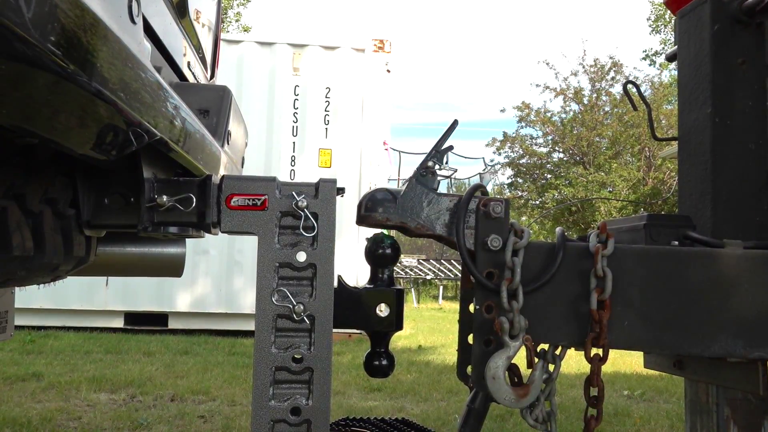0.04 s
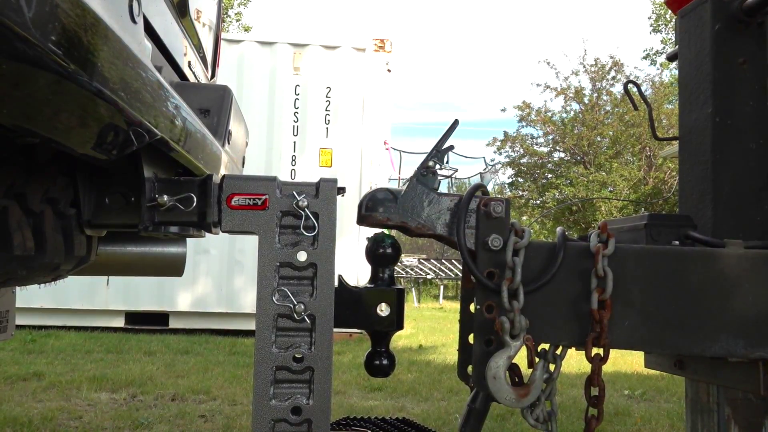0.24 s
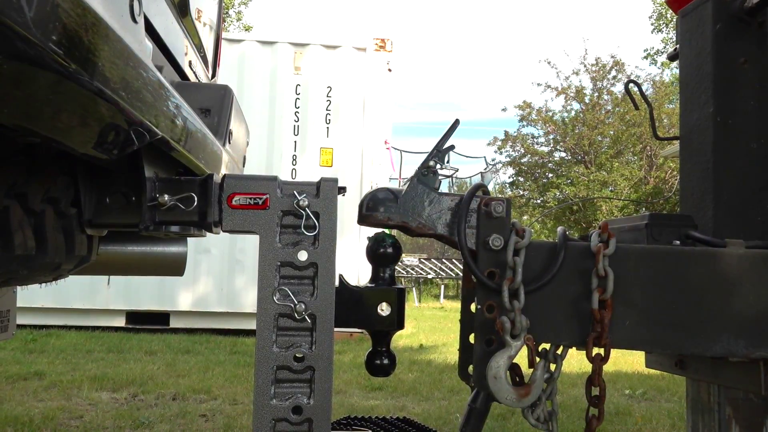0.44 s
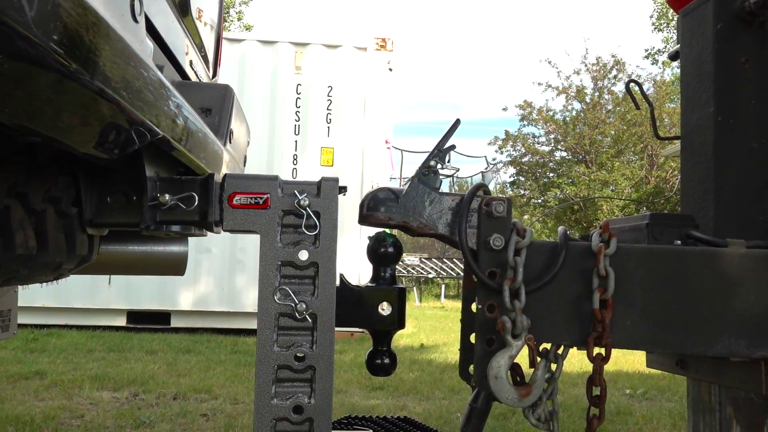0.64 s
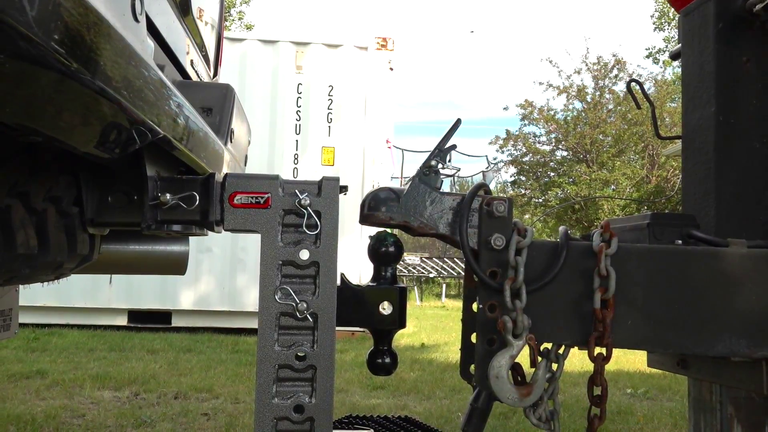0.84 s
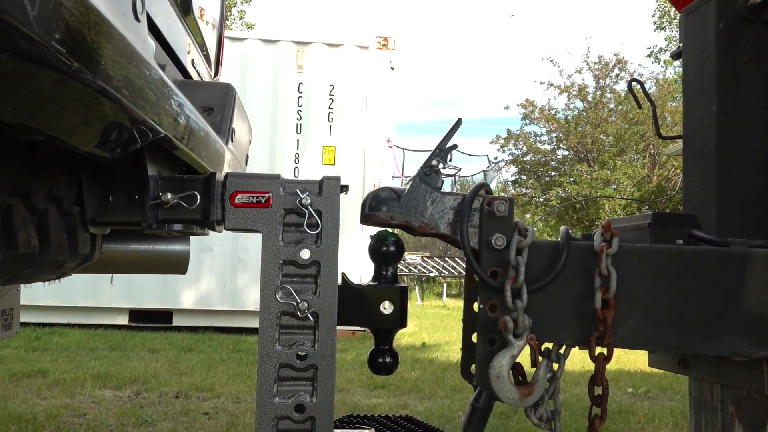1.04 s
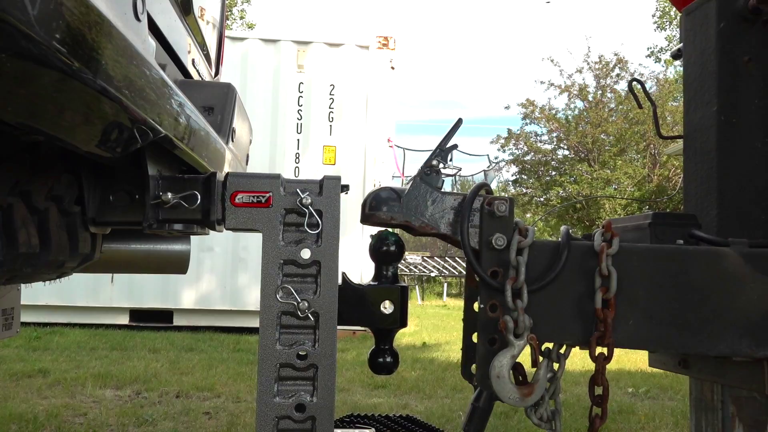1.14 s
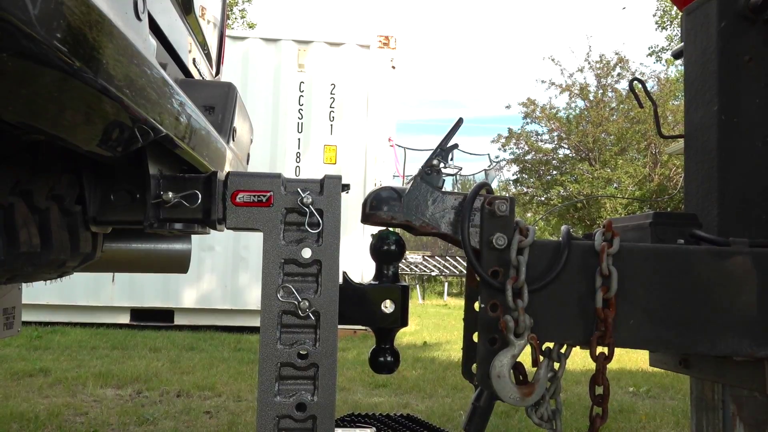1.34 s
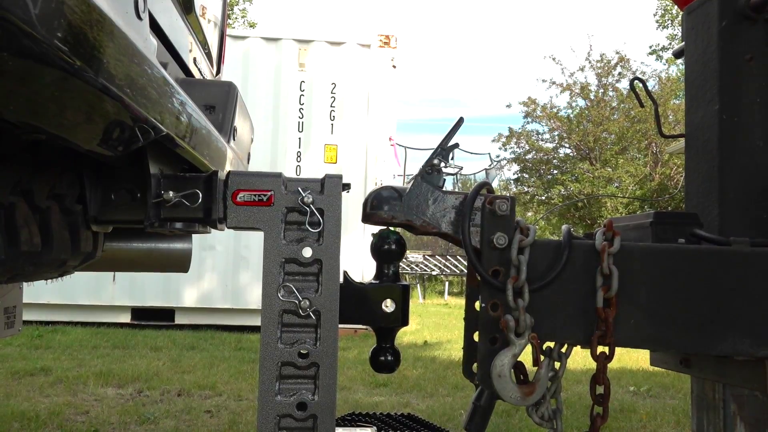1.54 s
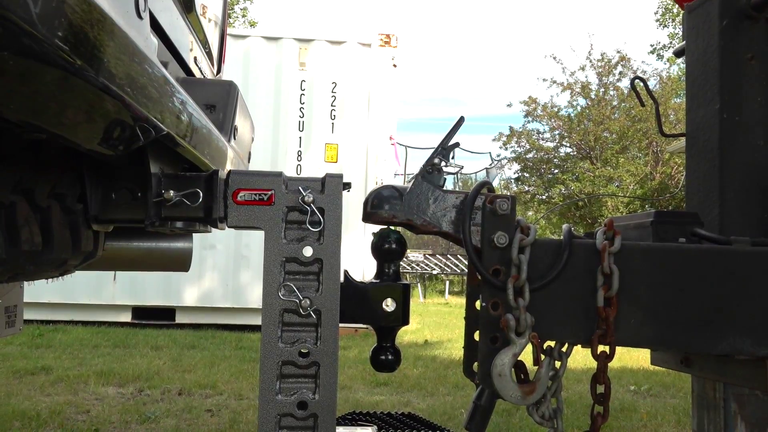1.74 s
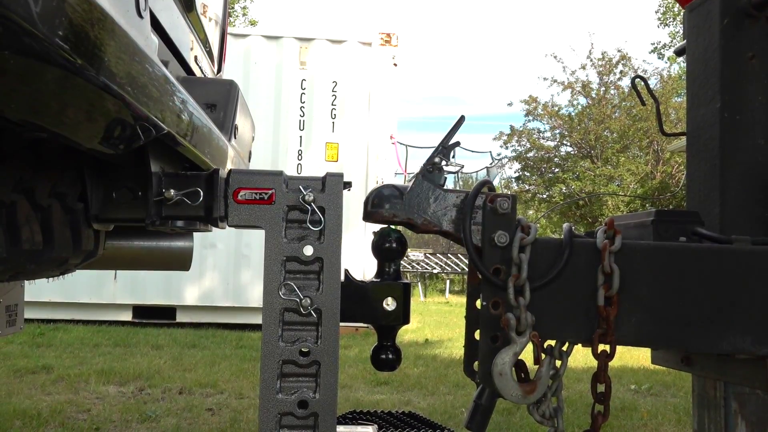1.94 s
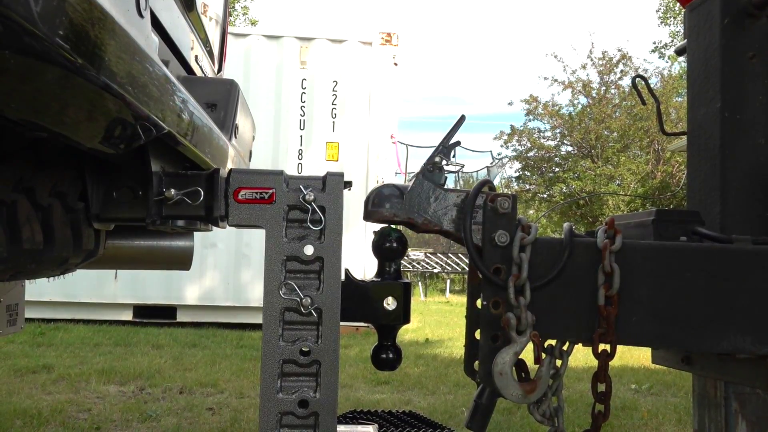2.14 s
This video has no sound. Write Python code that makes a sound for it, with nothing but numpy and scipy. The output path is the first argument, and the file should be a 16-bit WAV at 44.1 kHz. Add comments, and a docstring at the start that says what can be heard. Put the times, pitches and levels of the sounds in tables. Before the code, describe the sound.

Rusty steel scrapes and squeals, rasping from 0.17 seconds, loudest around 0.4 to 0.5, fading by 0.75, with a knock near 0.2. Hitch knocks cluster at 1.04 to 1.25, then a soft low bump at 1.33. Chain clicks and a brief scrape come at 1.45 to 1.8, fainter scraping and ticks at 2.0 to 2.17. Close, slightly right, short yard echo; faint engine idle and airy hiss throughout.

```python
"""Rusty steel scrapes and squeals as a jack turns to couple a trailer; the hitch knocks and chain links click.
Scrapes are filtered grit clicks, squeals wavering harmonic stacks, knocks and clicks damped modes with noise.
Low bumps of the frame are swelling sines. A truck engine idles softly: firing pulses ring an exhaust.
Coloured noise makes the open-air hiss. The stereo image sets the steel a little to the right."""
import sys
import numpy as np
from scipy import signal
from scipy.fft import rfft, irfft
from scipy.io import wavfile
from scipy.ndimage import uniform_filter1d

SR = 44100
rng = np.random.default_rng(int(sys.argv[2]) if len(sys.argv) > 2 else 0)


def to_wav(s):
    """Save 16-bit WAV."""
    ch = np.atleast_2d(s).T  # columns
    pcm = np.round(np.clip(ch, -1, 1) * 32767)  # PCM
    wavfile.write(sys.argv[1], SR, pcm.astype(np.int16))


def field_ratio(decibels):
    """Amplitude ratio for a level in dB (20 dB per decade); scalars and array-likes work."""
    return 10 ** (np.asarray(decibels, dtype=float) / 20)


N = 97020
T = np.arange(N) / SR

# eight firings of an engine cycle: [relative_db]
CYLINDER_DB = [9, -11.5, 6, 9, 9, 9, -8, 8]
# exhaust resonances: [centre_hz, width_hz of the first of two filters, rms_db]
EXHAUST_MODES = [(39.6, 5.4, -72), (60, 19, -81), (84, 15, -69), (95.6, 13, -67.5), (118.8, 12, -91),
                 (329.3, 27, -71.5), (389, 48, -70.5)]
# outdoor hiss spectrum: [freq_hz, relative_db]
AIR_SPECTRUM = [(30, -75), (60, -25), (100, -5.5), (170, -14.5), (260, -8.5), (450, -8.5), (800, -11.5),
                (1500, -14.5), (3000, -17.5), (5000, -20.5), (7000, -29.5), (9000, -35.5), (12000, -42),
                (16000, -48.5)]
# extra filter of the hiss side signal: [freq_hz, gain_db]
AIR_SIDE_SPECTRUM = [(60, -26), (300, -19), (1000, -8.5), (4000, -16), (8000, -8.5), (14000, 4.5)]
# stick-slip squeals: [middle_s, length_s, pitch_hz, relative_db, strongest_multiple]
SQUEALS = [(0.034, 0.025, 1372, -46.5, 1.1), (0.233, 0.06, 1768, -40.5, 1.4),
           (0.268, 0.032, 1790, -38.5, 2.1), (0.304, 0.075, 1906, -31.5, 1.3),
           (0.322, 0.033, 1522, -28.5, 2.1), (0.34, 0.055, 1795, -30, 2.1), (.348, 0.027, 1549, -27.5, 2.1),
           (0.36, 0.021, 1528, -27.5, 3.1), (0.389, .025, 2030, -25, 2.4), (0.418, 0.026, 1588, -24.5, 3.7),
           (0.428, 0.04, 1553, -19.5, 3.1), (0.441, 0.015, 1376, -26.5, 1.3), (.442, 0.011, 3882, -24, 1.1),
           (0.291, .03, 1920, -40.5, 3.1), (0.452, 0.034, 1754, -34, 1.1),
           (0.502, 0.093, 1881, -20.5, 1.45), (0.578, 0.07, 1936, -57, 1.1), (0.632, 0.07, 1627, -52, 1.1),
           (0.575, 0.024, 4140, -44.5, 0.9), (0.581, 0.03, 7180, -46, 0.9),
           (0.503, 0.055, 5930, -36.5, 0.9), (0.511, 0.028, 2300, -37.5, 2.1),
           (0.03, 0.014, 4070, -56, 1.1), (0.665, 0.015, 1880, -41, 1.4), (0.671, 0.031, 1620, -45, 2.1),
           (.686, .025, 1634, -48, 1.1), (1.559, 0.027, 1525, -55.5, 1.1), (1.586, 0.01, 2510, -43, 1.1),
           (1.591, 0.017, 1080, -41, 1.1), (1.612, 0.023, 877, -51.5, 1.1)]
# level curves, one list per scrape: [time_s, rasp_db, grind_db, hiss_db], all before SCRAPE_DB
SCRAPES = [
    [(0.16, -88, -76, -79), (0.172, -39, -49, -79), (0.192, -57, -54, -92), (0.204, -34, -36, -62),
     (0.238, -32, -40, -30), (0.274, -46, -37.5, -64), (0.286, -26, -45, -38.5), (0.306, -28, -75, -33.5),
     (0.326, -26.5, -27.5, -30), (0.358, -23.5, -33.5, -26), (0.376, -23.5, -49, -33),
     (0.388, -23, -44, -28.5), (0.4, -21, -31, -29.5), (0.414, -25.5, -40.5, -33),
     (0.424, -44, -31.5, -25.5), (0.442, -18, -58, -25), (0.46, -36.5, -43, -37), (0.476, -46, -44, -85),
     (0.492, -29.5, -55, -43), (0.51, -43.5, -50, -32), (0.546, -45.5, -49, -52), (0.576, -42, -49, -46.5),
     (0.655, -52.5, -47.5, -50), (0.672, -39.5, -45, -46), (0.738, -82, -50.5, -81), (0.76, -74, -80, -77)],
    [(1.53, -68, -51, -58), (1.548, -64.5, -62, -69), (1.57, -70, -58, -77), (1.582, -41.5, -40, -48),
     (1.59, -36, -41, -49.5), (1.606, -38.5, -36, -45), (1.62, -56, -44.5, -70), (1.652, -78, -51.5, -84)],
    [(1.98, -98, -77, -82), (1.992, -48.5, -88, -75), (2.016, -59, -44, -61), (2.044, -53.5, -57, -59),
     (2.068, -42.5, -46.5, -50), (2.078, -48.5, -57, -47), (2.088, -48, -55, -56), (2.102, -74, -80, -79)],
]
# rings of the rubbed steel: [centre_hz, width_hz before a fourfold widening, relative_db]
STEEL_MODES = [(1620, 100, 15), (1700, 9.6, -17), (2250, 10, 10), (2870, 55, 19.5), (3686, 10, 20),
               (3914, 54, 20), (4550, 8.2, 21.5), (6250, 24, 19), (7940, 13, -5)]
# scrape layer spectra: [freq_hz, relative_db]
RASP_SPECTRUM = [(1000, -22), (1800, 1.5), (3000, -1.5), (4500, 3), (5800, -7.5), (7500, -16.5),
                 (12000, -59)]
GRIND_SPECTRUM = [(120, -47), (300, -23), (500, -23.5), (900, 9), (1300, 13.5), (2000, 2), (3500, -37),
                  (9000, -92)]
HISS_SPECTRUM = [(4000, -24), (6000, 9.5), (8000, -3), (10500, -8), (11500, -22), (13500, -64),
                 (15500, -50), (16500, -91)]
HOOK_HZ = 5838  # ring shared by two of the clicks
# chain link clicks: [start_s, relative_db, ring_hz, ring_relative_db, ring_t60_s, tick_tilt_db_per_octave]
CLICKS = [(0.17, -65, 3860, 14, 0.029, -2), (.205, -37.5, 3585, 1.5, 0.085, -0.5),
          (1.45, -37.5, 2780, -5.5, 0.048, 4), (1.545, -58, 5380, 4.5, .03, -4),
          (1.182, -46, HOOK_HZ, 4.5, 0.3, 0), (1.592, -51.5, HOOK_HZ, 1, 0.13, -4),
          (1.728, -56.5, 6570, 11.5, 0.016, 2), (1.754, -45.5, 7600, -7, 0.1, -11),
          (1.755, -49.5, 3720, -6.5, 0.17, -5.5), (1.825, -55, 5420, -1, 0.032, -6),
          (1.992, -55, 2910, 1, 0.061, 1.5), (2.014, -59, 1370, 1, 0.028, 2),
          (2.15, -51, 9150, -12, 0.015, -1), (2.164, -45.5, 6900, -1, 0.062, -0.5),
          (2.166, -55, 6200, 0, .12, -7)]
# lower rings of a link: [ratio to ring_hz], [relative_db]
LINK_RATIOS = [.4, .67]
LINK_DB = [-16, -16]
# link tick spectrum before tilt: [freq_hz, relative_db]
TICK_SPECTRUM = [(600, -43), (1500, 9.5), (3000, 4.5), (4000, -2.5), (7000, 2), (9500, -7.5), (11500, -31),
                 (14000, -14), (16500, -22)]
# hitch knocks: [start_s, relative_db, crack_relative_db, tilt_db_per_octave, favoured_hz of the struck spot]
KNOCKS = [(0.198, -32.5, -6.5, -4.5, 950), (1.044, -34, -4.5, -5, 890), (1.127, -37, -5, -6, 944),
          (1.18, -30.5, 7, 2.5, 870), (1.191, -40.5, -7, 0, 2120), (1.2, -34, -2, -5, 750),
          (1.242, -39, -11, -6, 745), (1.7527, -45.5, -3.5, -1.5, 2140)]
# hitch modes before tilt and favour: [freq_hz, relative_db, t60_s]
HITCH_MODES = [(530, -8, 0.2), (692, -4.5, 0.31), (745, 3.5, 0.074), (890.6, 5.5, 0.14), (1285, 3.5, 0.11),
               (1750, -13, 0.12), (1895, 11.5, 0.069), (2120, 15.5, 0.041), (2780, -5, 0.1),
               (5130, -2, 0.037), (9600, -5, 0.1)]
# knock spectra, the crack before tilt: [freq_hz, relative_db]
CRACK_SPECTRUM = [(200, -39), (950, 17), (2000, 13), (4000, 11), (7000, 3), (10000, -2.5), (11500, -31),
                  (14000, -6), (16500, -46)]
CLATTER_SPECTRUM = [(80, -37.5), (300, -8.5), (600, 6.5), (900, 1), (2000, -11.5), (4000, -40),
                    (11000, -60)]
# low bumps of the frame: [middle_s, length_s, freq_hz, peak_db before a random waver]
BUMPS = [(0.252, 0.078, 184, -55.5), (.255, 0.13, 299, -57.5), (1.329, 0.061, 102.7, -47.5),
         (1.335, 0.023, 176, -52), (1.397, 0.1, 93, -57.5), (2.087, 0.22, 96.7, -56)]
# bass and top roll-off of the steel sounds: [freq_hz, gain_db]
STEEL_EDGES = [(60, -30), (220, 0), (10400, 0), (11300, -20), (12800, -9), (16000, -9)]

CYCLE_S, FIRST_FIRING_S, FIRING_SCATTER_DB = .2003, 0.02018, 2.5
BEAT_S, BEAT_LEN_S, BEAT_HZ, BEAT_DB = .084, 0.043, 263.7, -52.5
AIR_MID_DB = -57.5
# pitch, as fractions: random wobble, linear sag, droop at both ends
WOBBLE, SAG, ARCH = .004, .016, 0.035
FLUTTER_DB, TOP_HZ = 1.3, 10500
QUIET_ROUGHER = .35  # dB more wobble and flutter per dB less level
LOUD_RICHER = 0.18  # dB of side multiples per dB of level
PEAK_FALL_DB, SHELF_DB, SHELF_FALL_DB = 23.5, -2.5, 5  # fade of multiples beside the strongest
GRIT_PER_S, GRIT_SPREAD_DB, CHOP_DB = 9000, 1.8, 1.5
STEEL_DB, SCRAPE_DB = -2, -5.5
RISE_S, SNAP = 0.00047, .35  # snap: amplitude relative to the root energy of the noise envelope
SMALL_MODES, SMALL_T60_S, SMALL_DB = 120, .035, -4
CLICK_T60_S, RING_WAVER_DB = 0.053, 1.6
CONTACT_T60_S, BLOW = 0.057, 3  # blow: amplitude relative to the root energy of the rattling contact
FAVOUR_DB, FAVOUR_OCTAVES = 8, .1
CRACK_T60_S, CLATTER_DB, CLATTER_T60_S = 0.051, -13.5, 0.4
STEEL_PAN_DB, WIDE_HZ, WIDE_DB = -2.1, 7000, -7  # pan: left over right
YARD_DB, YARD_T60_S = -17, 0.12


def unit(x):
    """Scales to rms 1."""
    return x / np.sqrt(np.mean(x ** 2))


def unit_energy(h):
    """Scales to summed square 1."""
    return h / np.sqrt(np.sum(h ** 2))


def colour(x, points):
    """Minimum-phase filter through (freq_hz, gain_db) points, by folding the cepstrum."""
    hz, db = np.array(points, float).T
    f = np.maximum(np.arange(1025) * SR / 2048, 1)
    cepstrum = irfft(np.interp(np.log(f), np.log(hz), db) * np.log(10) / 20)
    cepstrum[1:1024] *= 2
    cepstrum[1025:] = 0
    return signal.fftconvolve(x, irfft(np.exp(rfft(cepstrum))))[:len(x)]


def tilted(points, db_per_octave, pivot_hz):
    """Spectrum points tilted about a pivot."""
    return [(f, d + db_per_octave * np.log2(f / pivot_hz)) for f, d in points]


def reso(x, hz, width_hz):
    """Resonance, gain 1 at the centre."""
    return signal.lfilter(*signal.iirpeak(hz, hz / width_hz, fs=SR), x)


def walk(rate_hz):
    """Twice-smoothed noise, rms 1."""
    k = max(int(SR / rate_hz), 1)
    return unit(uniform_filter1d(uniform_filter1d(rng.standard_normal(N), k), k))


def ring(t, hz, t60_s):
    """Damped sine from t = 0."""
    return (t > 0) * np.sin(2 * np.pi * hz * t) * 1000. ** (-np.maximum(t, 0) / t60_s)


def swell(u):
    """Raised-cosine swell over u = -.5 to .5."""
    return np.cos(np.pi * np.clip(u, -.5, .5)) ** 2


def small_rings(x):
    """Small parts: adds a crowd of brief random modes, 2.5 to 11 kHz, then scales to rms 1."""
    hz = rng.uniform(2500, 11000, (SMALL_MODES, 1))
    h = np.sum(rng.standard_normal(hz.shape) * ring(T[:3000], hz, SMALL_T60_S), 0)
    return unit(x + field_ratio(SMALL_DB) * signal.fftconvolve(x, unit_energy(h))[:N])


def burst(t, t60_s, points):
    """A snap and a coloured noise crack that rises fast, dies away and rings the small parts."""
    t = np.maximum(t, 0)
    shape = (1 - np.exp(-t / RISE_S)) * 1000. ** (-t / t60_s)
    x = rng.standard_normal(N) * shape
    x[np.argmax(t > 0)] = SNAP * np.sqrt(np.sum(shape ** 2))
    return small_rings(colour(x, points)) * np.sqrt(np.mean(shape ** 2))


def engine():
    """Eight uneven firings a cycle ring the exhaust; one hollow beat a cycle."""
    k, pad = np.arange(-8, 88), SR // 4  # pad: lead-in, so the exhaust already rings at t = 0
    pulses = np.zeros(N + pad)
    at = ((FIRST_FIRING_S + k * CYCLE_S / 8) * SR).astype(int) + pad
    firing_db = np.array(CYLINDER_DB)[k % 8] + FIRING_SCATTER_DB * rng.standard_normal(len(k))
    pulses[np.clip(at, 0, N + pad - 1)] = field_ratio(firing_db)
    exhaust = sum(field_ratio(db) * unit(reso(reso(pulses, f, w), f, 2 * w)[pad:]) for f, w, db in EXHAUST_MODES)
    t = (T - BEAT_S + CYCLE_S / 2) % CYCLE_S - CYCLE_S / 2
    beat = swell(t / BEAT_LEN_S) * np.sin(2 * np.pi * BEAT_HZ * t)
    return exhaust + field_ratio(BEAT_DB + 1.7 * walk(18.0)) * beat


def air():
    """Outdoor hiss: wavering coloured noise, wider in the treble."""
    mid, side = (field_ratio(.5 * walk(45)) * colour(rng.standard_normal(N), AIR_SPECTRUM) for _ in range(2))
    side = colour(side, AIR_SIDE_SPECTRUM)
    return field_ratio(AIR_MID_DB) * np.array([mid + side, mid - side]) / np.std(mid)


def squeals():
    """Stick-slip: short wavering harmonic stacks, sagging a little in pitch."""
    out, wobble, flutter = np.zeros(N), walk(260), [walk(450) for _ in range(6)]
    for mid, length, hz, db, strongest in SQUEALS:
        i = np.arange(max(int((mid - length / 2) * SR), 0), int((mid + length / 2) * SR))
        u = (T[i] - mid) / length
        rough = field_ratio(-QUIET_ROUGHER * (db + 22.5))
        pitch_hz = hz * (1 + WOBBLE * rough * wobble[i] - SAG * u - ARCH * u ** 2)
        phase = 2 * np.pi * np.cumsum(pitch_hz) / SR
        for k in range(1, 7):
            peak = field_ratio(-PEAK_FALL_DB * (k - strongest) ** 2)
            shelf = field_ratio(SHELF_DB - SHELF_FALL_DB * k + LOUD_RICHER * (db + 12.0))
            gain = (k * hz < TOP_HZ) * field_ratio(db) * (peak + shelf)
            envelope = swell(u) ** (.5 + k / 2) * field_ratio(FLUTTER_DB * rough * flutter[k - 1][i])
            out[i] -= np.sqrt(2) * gain * envelope * np.sin(k * phase + k * k)
    return out


def scrape():
    """Dense grit clicks rasp, ring the steel, grind low and hiss high."""
    grit = (rng.random(N) < GRIT_PER_S / SR) * rng.standard_normal(N)
    grit = grit * field_ratio(GRIT_SPREAD_DB * rng.exponential(size=N) + CHOP_DB * walk(220))
    steel = sum(field_ratio(db) * np.sqrt(1 / w) * reso(grit, f, 4 * w) for f, w, db in STEEL_MODES)
    rasp = unit(unit(colour(grit, RASP_SPECTRUM)) + field_ratio(STEEL_DB) * unit(steel))
    grind = unit(colour(grit, GRIND_SPECTRUM))
    hiss = small_rings(colour(grit, HISS_SPECTRUM))
    out = 0
    for rows in SCRAPES:
        s, *curves = np.array(rows).T
        for layer, db in zip((rasp, grind, hiss), curves):
            out = out + layer * field_ratio(SCRAPE_DB + np.interp(T, s, db, -120, -120))
    return out


def clicks():
    """Links tick and ring briefly, most at their own pitch; a swinging link's ring is unsteady."""
    out = 0
    for s, db, hz, ring_db, t60_s, tilt_db in CLICKS:
        t = T - s
        rings = ring(t, hz, t60_s)
        for ratio, low_db in zip(LINK_RATIOS, LINK_DB):
            rings = rings + field_ratio(low_db) * ring(t, hz * ratio, CLICK_T60_S)
        tick = burst(t, CLICK_T60_S, tilted(TICK_SPECTRUM, tilt_db, 4000))
        ring_gain = np.sqrt(2) * field_ratio(ring_db + RING_WAVER_DB * walk(150))
        out = out + field_ratio(db) * (ring_gain * rings + tick)
    return out


def knocks():
    """Rough blows ring the hitch modes under a crack and leave a low clatter."""
    out = 0
    for s, db, crack_db, tilt_db, spot_hz in KNOCKS:
        t = T - s
        contact = rng.standard_normal(2000) * 1000. ** (-T[:2000] / CONTACT_T60_S)
        contact[0] = BLOW * np.sqrt(np.sum(contact ** 2))
        modes = 0
        for f, d, t60_s in HITCH_MODES:
            favour_db = FAVOUR_DB * np.exp(-(np.log2(f / spot_hz) / FAVOUR_OCTAVES) ** 2)
            modes = modes + field_ratio(d + tilt_db * np.log2(f / 1000) + favour_db) * ring(t, f, t60_s)
        body = signal.fftconvolve(modes, unit_energy(contact))[:N] * field_ratio(-18)
        crack = burst(t, CRACK_T60_S, tilted(CRACK_SPECTRUM, tilt_db, 1000))
        clatter = burst(t, CLATTER_T60_S, CLATTER_SPECTRUM)
        out = out + field_ratio(db) * (body + field_ratio(crack_db) * crack + field_ratio(CLATTER_DB) * clatter)
    return out


def bumps():
    """Frame: soft low sine swells, wavering in level."""
    out = 0
    for s, length, hz, db in BUMPS:
        t = T - s
        out = out + field_ratio(db + 2 * walk(47)) * swell(t / length) * np.sin(2 * np.pi * hz * t)
    return out


def yard(steel):
    """Yard echo: two decaying noise tails after 6 ms, narrowed in stereo."""
    t = T[:SR // 2]
    tails = rng.standard_normal((2, len(t))) * 1000. ** (-t / YARD_T60_S) * (t > .006)
    echo = np.array([signal.fftconvolve(steel, unit_energy(h))[:N] for h in tails])
    return echo.mean(0) + 0.27 * (echo - echo.mean(0))


def widen(steel):
    """Stereo width: a quarter-turn phase shift, opposite in the two channels, strongest in the treble."""
    high = signal.butter(N=8, Wn=WIDE_HZ, btype="high", fs=SR, output="sos")
    treble = signal.sosfiltfilt(high, steel)
    return signal.hilbert(field_ratio(WIDE_DB) * treble + field_ratio(-16) * steel).imag * np.array([[1], [-1]])


def scene():
    """Steel to the right with short yard echoes; engine and bumps in the middle, air wide."""
    steel = colour(scrape() + squeals() + knocks() + clicks(), STEEL_EDGES)
    panned = steel * field_ratio(np.array([[.5], [-.5]]) * STEEL_PAN_DB)
    return panned + widen(steel) + field_ratio(YARD_DB) * yard(steel) + engine() + bumps() + air()


def roll_off(x):
    """The treble ends steeply here."""
    return signal.sosfilt(signal.butter(12, 16500, fs=SR, output="sos"), x)


def record(dry):
    """Last stage of the finished mix."""
    return roll_off(dry)


dry = scene()
out = record(dry)
to_wav(out)
```